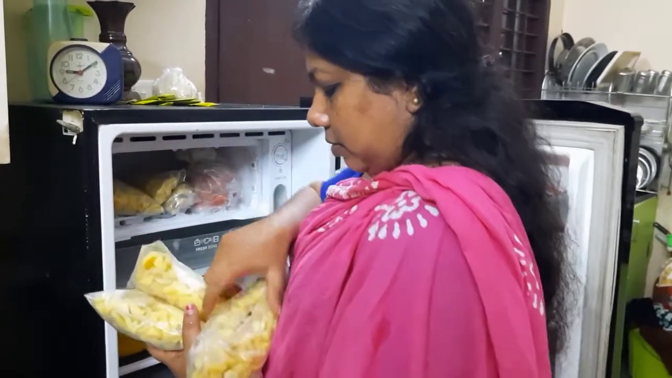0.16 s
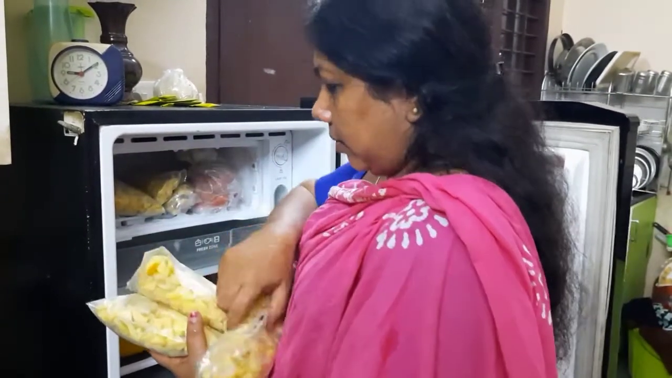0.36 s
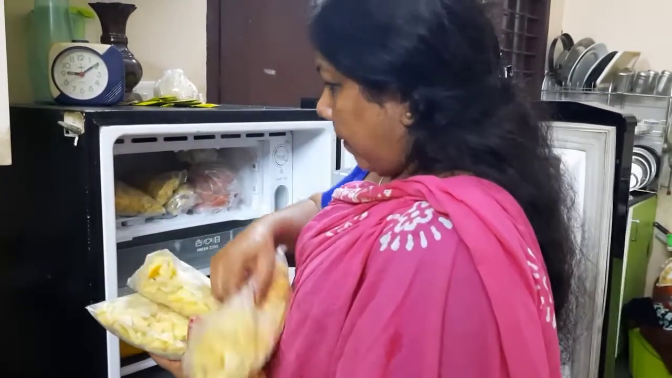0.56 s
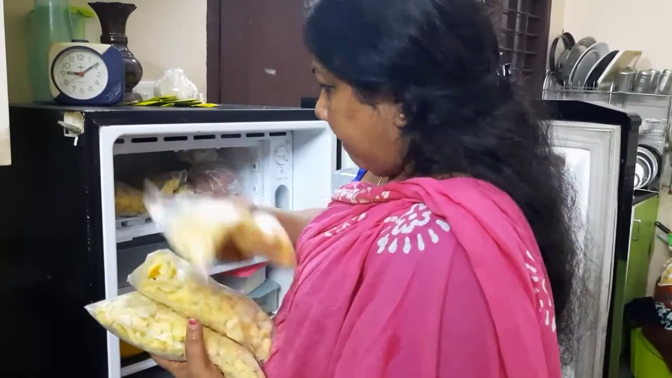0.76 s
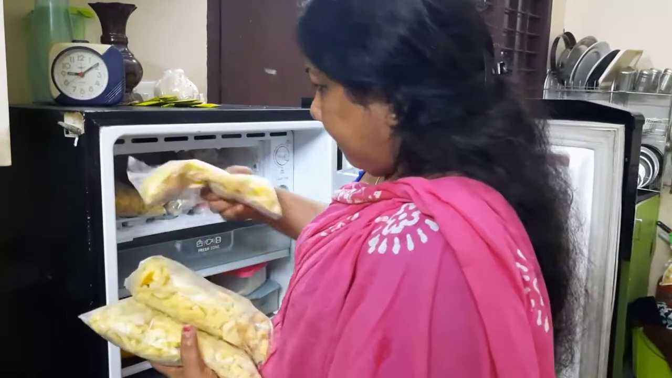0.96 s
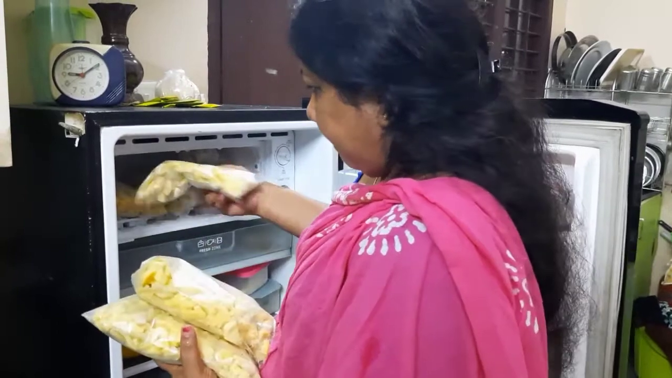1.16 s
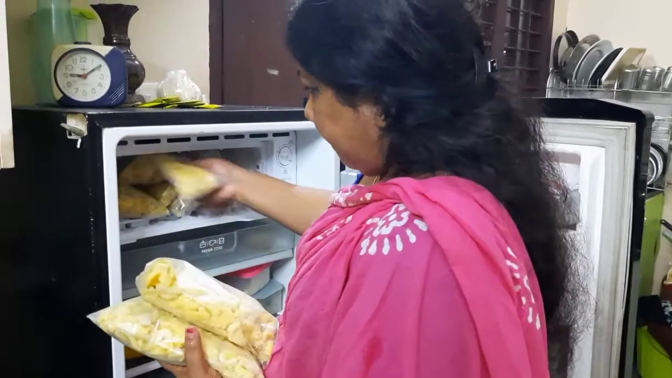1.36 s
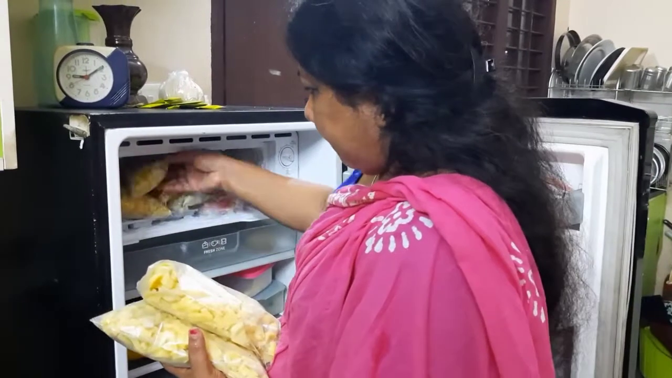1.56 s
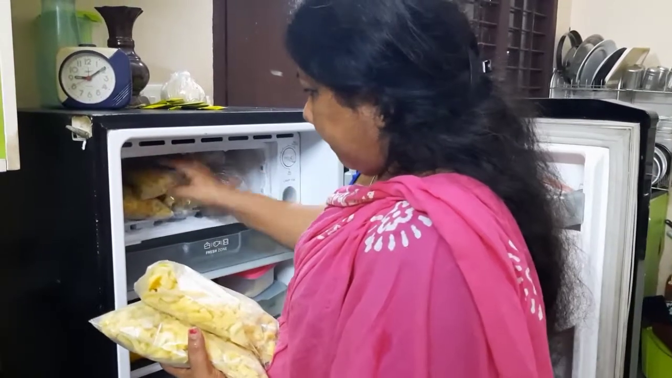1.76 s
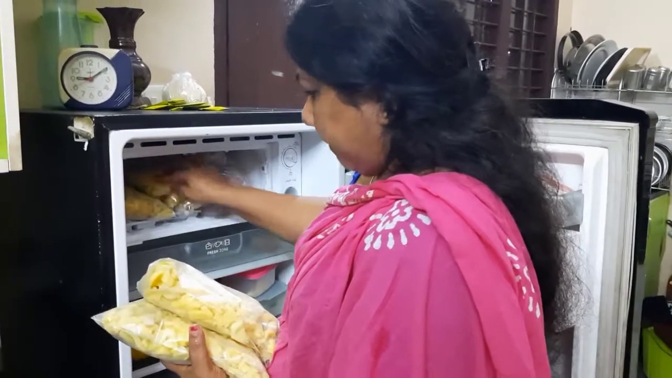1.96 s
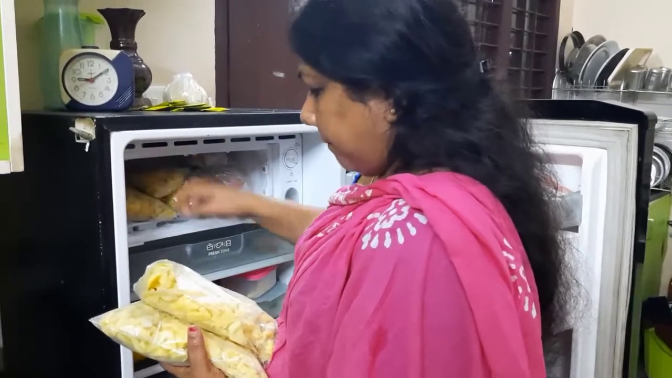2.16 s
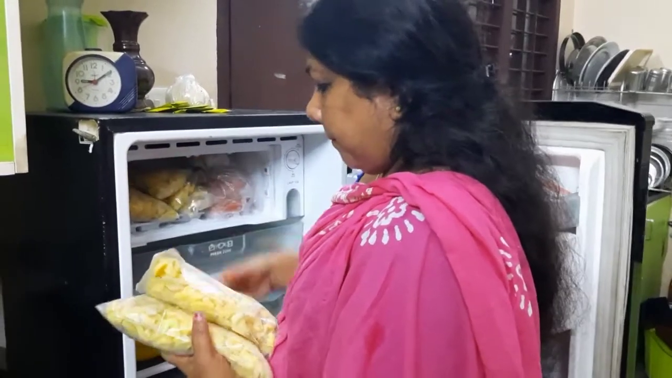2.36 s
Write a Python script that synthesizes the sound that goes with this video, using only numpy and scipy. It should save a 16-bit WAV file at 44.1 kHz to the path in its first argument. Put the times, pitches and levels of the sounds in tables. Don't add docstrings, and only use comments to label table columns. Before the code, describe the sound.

Close stereo microphones catch thin plastic crumpling around grain, a quiet gap broken by a springing snap, a soft landing knock, and two scraping shoves into a freezer; hard walls echo, a fridge hisses faintly.

```python
import sys
import numpy as np
from scipy import signal
from scipy.fft import rfft, irfft, next_fast_len
from scipy.io import wavfile
from scipy.ndimage import map_coordinates

SR = 44100
rng = np.random.default_rng(int(sys.argv[2]) if len(sys.argv) > 2 else 0)


def bounce(signal):
    frames = np.transpose(np.atleast_2d(signal))
    limited = np.clip(frames, -1, 1)
    pcm = np.round(limited * 32767).astype(np.int16)
    wavfile.write(sys.argv[1], SR, pcm)


def attenuation_scalar(level_db):
    decades = np.asarray(level_db, float) / 20
    return 10 ** decades


N = 105840

# start_s, level_db, extra_weight_db
CRUMPLE_EFFORT = [
    (0, -76, 1),
    (.04, -62, 11),
    (.045, -59, -1.5),
    (.15, -61.5, 3.5),
    (.21, -54.5, 3),
    (.27, -59, 9),
    (.33, -49.5, 5.5),
                  (0.337, -43.5, 1.5),
    (.37, -48.5, 9.5),
    (0.402, -42, 10),
    (0.421, -43.5, -3),
    (.47, -35, 6),
    (0.518, -46.5, 3.5),
    (.6, -53.5, 7.5),
    (.76, -55.5, -11),
    (.86, -81, -7),
]
# start_s, level_db, extra_weight_db
PUSH_EFFORT = [
    (1.357, -48.5, -3),
    (1.41, -47.5, 4.5),
    (1.47, -42.5, 1),
    (1.55, -43.5, -0.5),
    (1.63, -43, 0.5),
    (1.72, -46, 1),
    (1.76, -70.5, 16),
    (1.82, -67.5, 12.5),
]
# start_s, level_db, extra_weight_db
SHOVE_EFFORT = [
    (1.882, -51, 0.5),
    (1.945, -55.5, 5),
    (1.955, -46, 0),
    (1.99, -43.5, -1),
    (2.03, -41, -1),
    (2.07, -50, 2.5),
    (2.122, -51, -2),
    (2.16, -69, 0.5),
    (2.24, -106, -3),
]

# start_s, peak_db, bright_pitch_hz, dull_part_db, dull_pitch_hz
HAND_CREASES = [(.041, -38.5, 9000, 20, 1650), (.0685, -38, 8250, -0.5, 1030),
                (.1052, -36.5, 7000, -0.5, 3000), (.1452, -36.5, 8480, -11, 1060),
                (.1728, -29.5, 6600, -1.5, 1010), (.179, -44.5, 7000, 7, 950),
                (.2098, -29.5, 10400, -3, 2530), (.2125, -36, 8600, 0, 1110), (.25, -35, 11000, -14, 1350),
                (.2773, -24.5, 6100, -7.5, 1470), (.2975, -31, 8960, -4, 2340),
                (.3035, -22.5, 7600, -30, 2440), (.3098, -33, 8470, 2, 2510), (.335, -19.5, 9000, -1, 2600),
                (.3415, -25, 6000, -1, 2500), (.347, -30, 7000, -1, 2830), (.3775, -24, 8000, -0.5, 1390),
                (.389, -29, 6500, -1, 1000), (.397, -40, 4400, -6, 1300), (.4025, -28, 5000, 18, 1510),
                (.4247, -23.5, 7400, -7, 1830), (.429, -22.5, 10400, -5, 1400),
                (.4335, -27, 8500, -0.5, 1350), (.445, -17, 11300, -5.5, 2430), (.4695, -28, 4000, 4, 2660),
                (.474, -15.5, 7000, -3.5, 2060), (.482, -22, 8100, -0.5, 2430), (.493, -27, 7150, -3, 850),
                (.5003, -19.5, 7650, -3.5, 1530), (.506, -25, 5500, 9.5, 1240),
                (.5135, -29, 5930, -16, 1430), (.522, -37, 6000, 4, 1200), (.531, -33, 4880, 17, 970)]
# start_s, peak_db, bright_pitch_hz, dull_part_db, dull_pitch_hz
LIFT_CREASES = [(.5825, -21, 10300, -14, 900), (.6098, -23.5, 6600, -4, 1250),
                (.647, -26.5, 6500, -1, 2500), (.678, -38, 4200, -4, 2300), (.716, -40, 8000, -10, 2000),
                (.7233, -21.5, 12500, -3, 2000), (.7305, -33, 11400, -20, 1000),
                (.7412, -32, 9000, -15, 1800), (.762, -39, 12400, -20, 900), (.8195, -37, 4900, -1.5, 1000),
                (.843, -46, 9900, -2, 950), (.941, -52, 6000, 0, 2200), (1.081, -46, 9300, -2, 2000)]
# start_s, peak_db, bright_pitch_hz, dull_part_db, dull_pitch_hz
SPRING_OPEN = [
    (1.144, -41, 9000, -3, 2260),
    (1.149, -45, 5000, -3, 2000),
    (1.154, -45, 8000, -3, 2400),
    (1.159, -47, 4500, -3, 1800),
    (1.164, -46, 6500, -3, 2400),
    (1.1695, -19.5, 4500, -9, 1700),
    (1.1747, -26, 9500, -16, 1300),
]
# start_s, peak_db, bright_pitch_hz, dull_part_db, dull_pitch_hz
BOX_CREASES = [(1.358, -28.5, 5430, -1.5, 1780), (1.3665, -31.5, 8700, 0.5, 1250),
               (1.394, -32, 7250, -12, 1200), (1.423, -28, 6000, -14, 1050), (1.471, -30, 5270, 0, 1260),
               (1.4765, -23.5, 7400, -16, 1300), (1.514, -33, 8460, -5, 2590),
               (1.534, -28.5, 4040, -0.5, 910), (1.601, -25.5, 4300, -3.5, 2170),
               (1.6265, -21.5, 8400, -6, 1080), (1.634, -29, 8350, -21, 1130),
               (1.673, -33, 12000, -11, 820), (1.717, -33, 9050, -9, 2420), (1.881, -33, 9800, 2.5, 842),
               (1.8875, -37, 7000, -2.5, 2770), (1.9505, -25.5, 11100, -7, 1840),
               (1.9915, -29.5, 12500, 2, 1620), (2.019, -28, 7000, -3, 1940), (2.0315, -29, 6900, 0, 970),
               (2.045, -35, 7000, -2.5, 2000), (2.08, -32.5, 5700, -16, 820), (2.126, -38, 8200, -23, 2470),
               (2.393, -51, 5030, -1, 2240)]

# pitch_hz, level_db
HAND_FILM_COLOUR = [(300, -12.5), (1000, 2), (2500, -3), (4000, -6), (9000, -17), (16000, -30)]
# pitch_hz, level_db
BOX_FILM_COLOUR = [(300, -1.5), (1000, -14.5), (2500, 8), (4000, 2.5), (9000, 2), (16000, -1.5)]
# pitch_hz, width_hz, level_db
FILLING_MODES = [(263, 43, -2), (504, 150, 10), (990, 490, -6), (1310, 140, 7.5), (1880, 780, -12),
                 (2430, 177, 11)]
# pitch_hz, width_hz, level_db
BOX_MODES = [(166, 91, -8.5), (272.7, 32, 3), (411, 90, -6), (525, 54, -3), (875, 380, -12),
             (1340, 130, -8), (1860, 340, -16.5)]
# start_s, level_db, pitch_hz, t60_s
SHELF_KNOCK = (1.363, -31, 480, .07)

# pitch_hz, t60_s
ROOM_DECAY = [(150, 0.32), (600, .36), (1200, .44), (2500, 0.49), (5500, 0.44), (15000, 0.39)]
# pitch_hz, level_db (per Hz)
HISS_COLOUR = [(25, 2), (100, -3), (300, -4), (500, -5.5), (900, -10), (4500, -9), (9000, -6.5),
               (15000, -32)]
# pitch_hz, width_hz, level_db
COOLANT_MODES = [(2200, 500, -4), (3120, 330, 0), (5460, 400, -6), (7300, 900, -6), (9100, 400, -7),
                 (10000, 350, -5)]
# start_s, level_db
BODY_SHADE = [
    (0, 4),
    (.8, 2.5),
    (1.0, 2.5),
    (1.3, 1.5),
    (1.9, 6),
    (2.2, -0.5),
    (2.4, 1.5),
]

# pitch_hz, left_right_likeness (0 to 1)
MIC_LIKENESS = [(30, .3), (60, 0.37), (150, 0.72), (300, 0.87), (700, 0.41), (2000, 0.13), (5000, 0.036)]
# pitch_hz, level_db
MIC_LEAN = [(60, -3), (500, 0.6), (1200, 0.5), (2500, 3.5), (5000, -0.8), (13000, -2)]


def unit(x):
    return x / np.sqrt(np.mean(x ** 2) + 1e-20)


def along(points, hz):
    f, v = np.transpose(points)
    return np.interp(np.log(hz + 1), np.log(f + 1), v)


def filtered(x, response):
    m = next_fast_len(x.shape[-1] + 8192)
    spectrum = rfft(x, m) * response(np.fft.rfftfreq(m, 1 / SR))
    return irfft(spectrum, m)[..., :x.shape[-1]]


def rings(peaks):
    def response(f):
        total = 0
        for k, (centre, width, db) in enumerate(peaks):
            band = 1j * f * width
            total = total + (-1) ** k * attenuation_scalar(db) * band / (centre * centre - f * f + band)
        return total
    return response


def wobble(rate):
    knots = rng.standard_normal(int(N / SR * 200) + 8)
    return map_coordinates(knots, [np.arange(N) * min(rate, 190) / SR])


def crackle(effort, film, body, film_db, body_db, spiky_db, clump_db):
    s, db, weight_db = np.transpose(effort)
    now = np.arange(N) / SR
    level = attenuation_scalar(np.interp(now, s, db, left=-150, right=-150))
    starts = rng.random(N) < 1500 / SR
    size = starts * attenuation_scalar(spiky_db * np.minimum(rng.exponential(size=N), 3.5))
    buckle_t60_s = 0.0024
    life = signal.lfilter([1], [1, -attenuation_scalar(-60 / (buckle_t60_s * SR))], size)
    clumped = (life + 0.39) * attenuation_scalar(clump_db * wobble(60.46))
    buckles = unit(clumped * rng.standard_normal((2, N)))
    bright = unit(filtered(buckles, lambda hz: attenuation_scalar(along(film, hz))))
    dull = unit(filtered(buckles * attenuation_scalar(2.1 * wobble(25.66)), rings(body)))
    weight = attenuation_scalar(body_db + np.interp(now, s, weight_db))
    return level * (attenuation_scalar(film_db) * bright + weight * dull)


def crease_colour(pitch_hz, dull_db, dull_hz):
    film = rings([(pitch_hz, 0.74 * pitch_hz, 0)])
    mass = rings([(dull_hz, 0.54 * dull_hz, 0)])
    share = np.sqrt(np.clip(1 - attenuation_scalar(2 * dull_db), .05, 1))

    def colour(f):
        click = 0.57 * (1j * f / (1500 + 1j * f)) ** 2
        return share * (film(f) + click) + attenuation_scalar(dull_db + 4.5) * mass(f) ** 2
    return colour


def snaps(rows):
    out, t = np.zeros((2, 2, N + 1024)), np.arange(1024) / SR
    crease_t60_s, hold_s, jolt = .006, .0005, 2.5
    for s, db, pitch_hz, dull_db, dull_hz in rows:
        burst = rng.standard_normal((2, 1024)) * attenuation_scalar(-60 * np.maximum(t - hold_s, 0) / crease_t60_s)
        burst[:, 0] = jolt * np.sign(burst[:, 0])
        colour = crease_colour(pitch_hz, dull_db, dull_hz)
        near = filtered(burst, colour)
        near = attenuation_scalar(db + 4.0) * near / abs(near[0]).max()
        far = filtered(np.array([t == 0, t == 0], float), colour)
        far = attenuation_scalar(-0.5) * far * np.linalg.norm(near) / np.linalg.norm(far)
        out[..., round(s * SR):][..., :1024] += np.array([near, far])
    return out[..., :N]


def thump():
    s, db, hz, t60 = SHELF_KNOCK
    t = np.maximum(np.arange(N) / SR - s, 0)
    onset = 1 - np.exp(-t / 0.0031)
    knock = attenuation_scalar(db - 60 * t / t60) * np.sin(2 * np.pi * hz * t) * onset
    return knock * np.array([[1], [0]])


def kitchen(x):
    noise = rng.standard_normal((2, SR * 3 // 4))
    hz, t, z = signal.stft(noise, SR, nperseg=256)
    decay = attenuation_scalar(-60 * t / along(ROOM_DECAY, hz)[:, None])
    tail = signal.istft(z * decay, SR, nperseg=256)[1]
    tail *= attenuation_scalar(-2) / np.linalg.norm(tail[0])
    wall = round(.005 * SR)
    tail = np.pad(tail, ((0, 0), (wall, 0)))
    tail[:, wall] += attenuation_scalar(-14) * np.array([1, .4])
    return signal.fftconvolve(x, tail, axes=1)[:, :N]


def fridge():
    hiss = unit(filtered(rng.standard_normal((2, N)), lambda hz: attenuation_scalar(along(HISS_COLOUR, hz))))
    whistle = unit(filtered(rng.standard_normal((2, N)), lambda hz: rings(COOLANT_MODES)(hz) ** 2))
    shade = attenuation_scalar(np.interp(np.arange(N) / SR, *np.transpose(BODY_SHADE)))
    hiss_level = attenuation_scalar(-67 + 4.2 * wobble(9.36))
    whistle_level = attenuation_scalar(-63.5 + 4.5 * wobble(21.5))
    return shade * (hiss_level * hiss + whistle_level * whistle)


def ports(pair):
    def turn(hz):
        return np.arccos(np.clip(along(MIC_LIKENESS, hz), -1, 1)) / 2
    mid, side = filtered(pair, lambda hz: np.array([np.cos(turn(hz)), np.sin(turn(hz))]))
    return np.array([mid + side, mid - side])


def scene():
    in_hand = crackle(CRUMPLE_EFFORT, HAND_FILM_COLOUR, FILLING_MODES,
                      film_db=2.5, body_db=-1.5, spiky_db=4.0, clump_db=4.0)
    in_box = crackle(PUSH_EFFORT + SHOVE_EFFORT, BOX_FILM_COLOUR, BOX_MODES,
                     film_db=2, body_db=1, spiky_db=1.2, clump_db=1.2)
    bags = in_hand + in_box
    hand_near, hand_far = snaps(HAND_CREASES)
    lift_near, lift_far = snaps(LIFT_CREASES)
    pop_near, pop_far = snaps(SPRING_OPEN)
    box_near, box_far = snaps(BOX_CREASES)
    direct = bags + hand_near + lift_near + pop_near + box_near + thump()
    echoes = kitchen(bags) + kitchen(hand_far + box_far) + kitchen(lift_far + attenuation_scalar(5.5) * pop_far)
    return ports(direct + echoes + fridge())


def low_pass(x):
    return signal.sosfilt(signal.butter(12, 16800, fs=SR, output="sos"), x)


def record(dry):
    def microphones(hz):
        lean_db = np.array([[.5], [-.5]]) * along(MIC_LEAN, hz)
        top_db = -70 * np.maximum(hz - 15100, 0) / 1000
        bass_cut = (1j * hz / (90 + 1j * hz)) ** 2
        return attenuation_scalar(lean_db + top_db) * bass_cut
    return low_pass(filtered(dry, microphones))


dry = scene()
out = record(dry)
bounce(out)
```